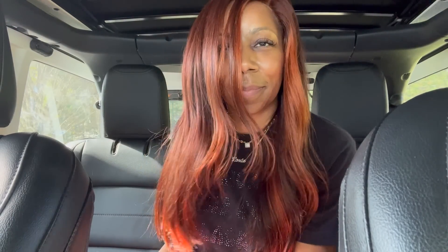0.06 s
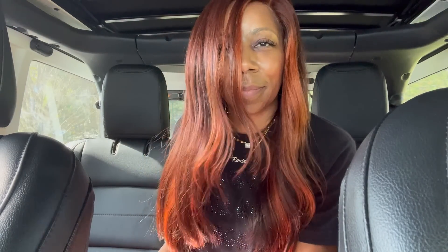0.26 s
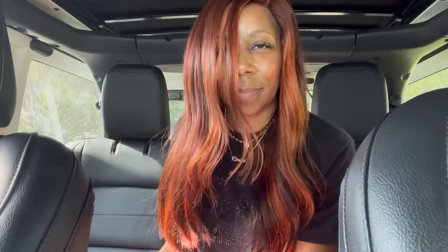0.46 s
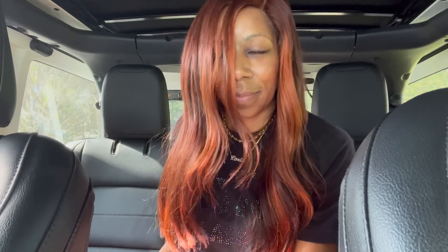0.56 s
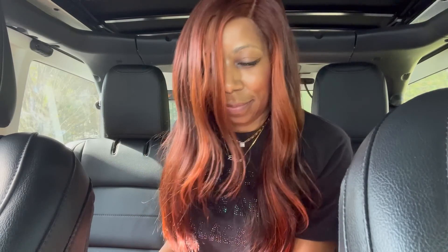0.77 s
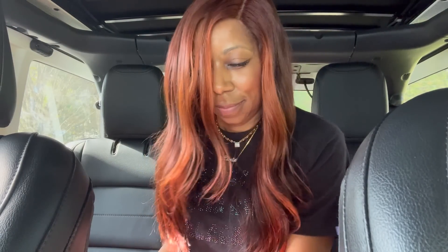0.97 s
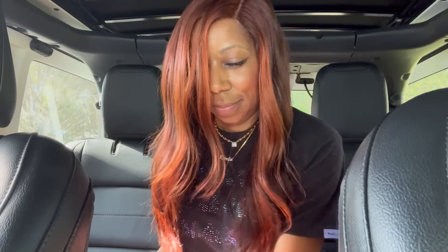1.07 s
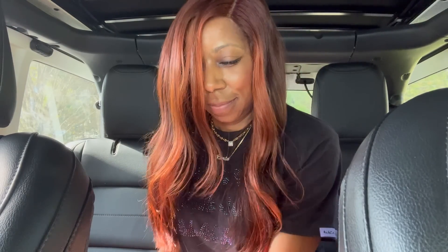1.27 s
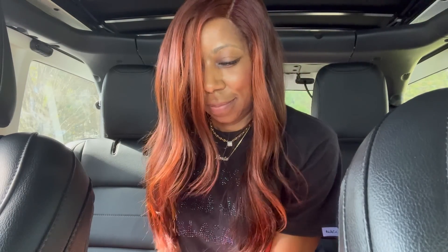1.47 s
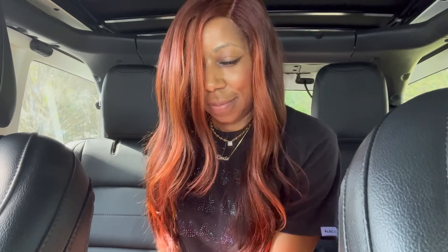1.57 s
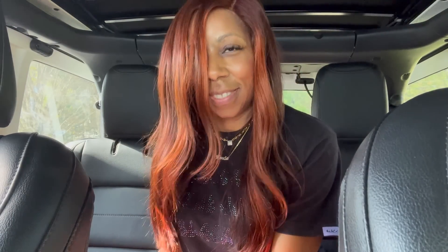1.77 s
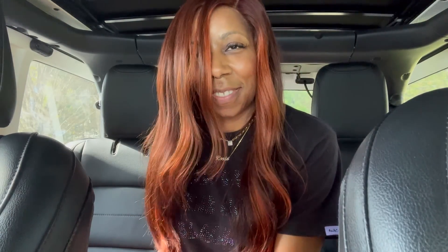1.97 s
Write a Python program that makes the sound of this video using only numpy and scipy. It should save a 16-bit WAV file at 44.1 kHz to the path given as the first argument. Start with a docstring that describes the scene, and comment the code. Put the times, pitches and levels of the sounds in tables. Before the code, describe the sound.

An electric car window is already moving, hissing along its seals with a faint motor whir, rubbing harder before a deep, boomy thump at 0.46 seconds. Low idling hum and cabin rumble continue. Small plastic ticks, a soft switch click at 0.82 and faint rustling follow. At 1.62 the switch clicks, the drive clunks twice, the door shudders briefly, and a clearer rising motor whine runs to the end.

```python
"""Inside an idling car. Engine hum (wavering sines) sits over cabin rumble (coloured noise). A window
hisses along its seals (noise), its motor whining (gliding sines), and lands with a low thump (swelling door modes).
Trim ticks and switch clicks are grainy noise bursts with ringing modes; a faint rustle comes and goes.
The drive clunks into gear (noise and panel modes), the door shudders (a run of pulses) and the motor runs again."""
import sys
import numpy as np
from scipy import signal
from scipy.fft import rfft, irfft
from scipy.io import wavfile

SR = 44100
rng = np.random.default_rng(int(sys.argv[2]) if len(sys.argv) > 2 else 0)


def unload_audio(sound):
    """Save the sound as a 16-bit wav file, at the path given as the first command line argument."""
    columns = np.transpose(np.atleast_2d(sound))
    # keep every value between -1 and 1, then stretch to whole-number steps
    steps = np.round(np.clip(columns, -1, 1) * 32767)
    wavfile.write(sys.argv[1], SR, steps.astype(np.int16))


N = 88200
T = np.arange(N) / SR  # time [s]

# phase by which the left microphone leads the right: (frequency [Hz], phase [rad])
LEFT_LEAD = [(100, .1), (320, -.2), (500, .8), (700, 2.6), (1000, 1.3), (1700, 2.7), (3000, 6.1),
             (4500, 9.3), (5700, 12.6), (7200, 15.5), (9000, 16.4), (10600, 18.8), (12600, 18.9),
             (14200, 22)]
# low colour of the squeezed rubber and of the shudder: (frequency [Hz], level per Hz [dB])
LOW_COLOUR = [(20, -9), (38, 4.5), (110, 2.5), (200, -19.5), (400, -28), (1000, -53.5), (8000, -100)]


def from_db(db):
    """Decibels to gain, down to a floor far below hearing."""
    return np.exp(np.maximum(db, -300) * (np.log(10) / 20))


def pan(db):
    """Left and right gains for a level difference; positive is louder on the left."""
    return from_db(np.array([[db], [-db]]) / 2)


def at_hz(points, hz):
    """Read a table on a log-frequency axis."""
    f, value = np.transpose(points)
    return np.interp(np.log(hz + 1), np.log(f), value)


def noise(spectrum):
    """Coloured cabin noise at a pair of microphones, falling away below its first point; overall rms 1."""
    # how alike the two microphones hear, negative read as 0: (frequency [Hz], coherence)
    likeness = [(40, 0.54), (90, 0.75), (200, 0.4), (300, 0.82), (480, -0.17), (680, 0.78), (1000, 0.3),
                (2200, 0.25), (3500, 0.32), (6000, -0.22), (8000, 0.98), (9500, 0.58), (11000, 0.9),
                (14000, 0.98)]
    # left-right balance: (frequency [Hz], level difference [dB])
    tilt = [(180, 1.5), (290, -2.5), (430, -0.2), (800, -0.5), (2300, 0), (3500, -3), (5200, -4.5),
            (7000, -1.5), (8000, 0)]
    hz = np.fft.rfftfreq(N, 1 / SR)
    alike = np.clip(at_hz(likeness, hz), 0, .98)
    mid, side = rfft(rng.standard_normal((2, N)))
    sign = np.array([[1], [-1]])  # left, right
    balance = from_db(sign * at_hz(tilt, hz) / 2)
    ears = balance * np.exp(.5j * sign * at_hz(LEFT_LEAD, hz))
    low_cut = np.minimum(hz / spectrum[0][0], 1) ** 2
    gain = from_db(at_hz(spectrum, hz)) * low_cut
    blend = np.sqrt(1 + alike) * mid + np.sqrt(1 - alike) * side * sign
    x = irfft(gain * ears * blend, N)
    return x / x.std()


def drift(rate):
    """Slow random wavering, fading above the rate [Hz]; spread 1."""
    hz = np.fft.rfftfreq(N, 1 / SR)
    x = irfft(rfft(rng.standard_normal(N)) / (1 + (hz / rate) ** 2) ** 2, N)
    return (x - x.mean()) / x.std()


def gate(start, stop, rise, t60):
    """Straight attack, hold until stop, exponential release."""
    attack = np.clip((T - start) / rise, 0, 1)
    return attack * from_db(-60 * np.maximum(T - stop, 0) / t60)


def hit(start, rise, t60):
    """Attack, then release at once."""
    return gate(start, start + rise, rise, t60)


def swelling_sine(start, hz, swell):
    """A struck mode: its envelope swells to 1 over the swell time [s], then dies away."""
    age = np.maximum(T - start, 0)
    return age / swell * np.exp(1 - age / swell) * np.sin(2 * np.pi * hz * age)


def ringing(modes, start, size=8192):
    """One brief strike on a set of modes, each with a random strength and phase in either ear."""
    STRENGTH_SCATTER_DB = 1.5
    age, first = T[:size], int(start * SR)
    ring = 0
    for hz, db, t60 in modes:
        strength = from_db(db + STRENGTH_SCATTER_DB * rng.standard_normal((2, 1)))
        wave = np.sin(2 * np.pi * (hz * age + rng.random((2, 1))))
        ring = ring + strength * from_db(-60 * age / t60) * wave
    out = np.zeros((2, N))
    out[:, first:first + size] = ring * np.minimum(age / 0.0016, 1)
    return out


def idle():
    """Engine orders, multiples of a wandering firing rate, over a rumble that swells softly now and then."""
    FIRING_HZ, WANDER_SHARE, FLUTTER_DB, RUMBLE_DB = 70.48, 0.0083, 2.0, -36
    # engine orders: (multiple of the firing rate, level [dB], left-right difference [dB])
    orders = [(1, -50.5, -13.5), (2, -44, -2), (3, -53.5, -1), (4, -46.5, -6)]
    # colour of the cabin rumble: (frequency [Hz], level per Hz [dB])
    rumble_colour = [(18, -6), (30, -3), (48, 2.5), (90, 1), (125, -5.5), (170, -13.5), (300, -14.5),
                     (430, -17.5), (560, -19.5), (690, -20.5), (900, -23), (1200, -33), (2000, -35.5),
                     (3500, -45.5), (6000, -51), (8000, -60.5), (12000, -59), (15000, -69)]
    # soft swells: (centre time [s], level [dB], half width [s])
    soft_swells = [(.125, -39, .03), (.225, -35.5, 0.02), (.365, -40.5, 0.026), (0.829, -40, 0.028),
                   (1.2, -40, 0.047), (1.55, -40, 0.027)]
    # colour of the swells: (frequency [Hz], level per Hz [dB])
    swell_colour = [(60, -10), (130, 3), (220, -7), (420, -10), (650, -19), (1200, -34), (8000, -90)]
    phase = 2 * np.pi * np.cumsum(FIRING_HZ * (1 + WANDER_SHARE * drift(3))) / SR
    hum = 0
    for multiple, db, left_right in orders:
        level = from_db(db + FLUTTER_DB * drift(7.3))
        hum = hum + pan(left_right) * level * np.sin(multiple * phase + 2 * np.pi * rng.random())
    swells = sum(from_db(db) * np.exp(-.5 * ((T - s) / width) ** 2) for s, db, width in soft_swells)
    rumble = from_db(RUMBLE_DB) * noise(rumble_colour)
    return np.sqrt(2) * hum + rumble + swells * noise(swell_colour)


def window_runs():
    """The glass hisses along its seals while the motor's whining partials glide up to full speed."""
    HISS_RISE_S, RELEASE_T60_S = 0.011, 0.069
    WHINE_DELAY_S, WHINE_RISE_S = 0.025, 0.035  # the whine fades in after the hiss starts
    GLIDE_PER_S2, SPIN_UP_S = 0.1255, .34  # pitch gained, as a share per second squared, and for how long
    WAVER_SHARE, FLUTTER_DB = .002, 1.5
    # window runs: (start [s], stop [s], hiss level [dB], whine at start [Hz], whine level [dB])
    runs = [(-.4, 0.48, -49.5, 782, -66.5), (1.679, 2.2, -48, 786, -50.5)]
    # colour of the seals: (frequency [Hz], level per Hz [dB])
    seal_colour = [(250, 18), (500, 13.5), (900, 5), (1250, 0.5), (2200, -0.5), (3500, 2), (6000, -1),
                   (8000, -3), (10000, -4.5), (12500, -5), (14500, -5)]
    # motor partials: (multiple of the whine, relative level [dB])
    motor_partials = [(.5, -18), (.68, -13), (1, 0.5), (2, -18), (3, -20)]
    # the seal rubs harder just before the stop: (time [s], level [dB])
    rub_level = [(.37, -65), (.42, -50.5), (.465, -50), (.51, -82)]
    # colour of the rub: (frequency [Hz], level per Hz [dB])
    rub_colour = [(1500, 8), (3000, 5), (6000, 1), (8500, -4), (12000, 1.5), (14500, -10.5)]
    out = 0
    hiss = noise(seal_colour) * from_db(.6 * drift(12))
    for start, stop, hiss_db, hz, whine_db in runs:
        age = np.maximum(T - start, 0)
        speed = 1 + GLIDE_PER_S2 * np.minimum(age, SPIN_UP_S) ** 2 + WAVER_SHARE * drift(13)
        phase = 2 * np.pi * np.cumsum(hz * speed) / SR
        whine = 0
        for multiple, db in motor_partials:
            level = from_db(whine_db + db + FLUTTER_DB * drift(44))
            whine = whine + level * np.sin(multiple * phase + np.array([[.6], [0]]))
        whine_gate = gate(start + WHINE_DELAY_S, stop, WHINE_RISE_S, RELEASE_T60_S)
        out = out + np.sqrt(2) * whine * pan(db=2) * whine_gate
        out = out + from_db(hiss_db) * hiss * gate(start, stop, HISS_RISE_S, RELEASE_T60_S)
    rub_db = np.interp(T, *np.transpose(rub_level), left=-120, right=-120)
    return out + from_db(rub_db) * noise(rub_colour)


def ticks():
    """Plastic ticks of the trim: grainy noise bursts, dull and bright, over the modes they ring."""
    GRAIN_DB, DULL_RING_DB, SNAP_NOISE_DB = 2.5, -1.5, 0.5  # flutter, then offsets to the tick levels
    # trim ticks: (time [s], dull level [dB], bright snap level [dB], noise t60 [s])
    trim_ticks = [(0.049, -44, -63, 0.13), (0.661, -46.5, -82, 0.1), (0.927, -46.5, -84, 0.12),
                  (1.074, -53, -58, 0.087), (1.162, -47.5, -72, 0.079), (1.3684, -43.5, -46, 0.13),
                  (1.397, -55, -69, 0.078), (1.584, -53, -59.5, 0.053)]
    # colour of the dull tick: (frequency [Hz], level per Hz [dB])
    dull_colour = [(300, -16), (900, 12), (1500, 0.5), (2100, 0.5), (2500, -8), (3400, 2.5), (4700, -5.5),
                   (6000, -21), (8000, -44)]
    # colour of the bright snap: (frequency [Hz], level per Hz [dB])
    snap_colour = [(1500, 16), (3200, -7), (4500, 5), (5800, 6), (7500, -1.5), (11000, -6.5), (13000, -4),
                   (15500, -23)]
    # modes of the dull tick: (frequency [Hz], relative level [dB], t60 [s])
    dull_modes = [(948, -3.5, 0.075), (1257, -16, 0.14), (1980, -3.5, 0.081), (3460, -5.5, 0.078),
                  (3830, -9, 0.093)]
    # modes of the bright snap: (frequency [Hz], relative level [dB], t60 [s])
    snap_modes = [(1214, -0.5, 0.061), (2900, -2.5, 0.088), (3170, -4, .08), (3510, -16, 0.067),
                  (4534, -2, 0.076), (5820, -3.5, 0.098), (10200, -11.5, 0.07)]
    grain = from_db(GRAIN_DB * drift(400))
    dull = noise(dull_colour) * grain
    snap = noise(snap_colour) * grain * from_db(SNAP_NOISE_DB)
    out = 0
    for s, db, snap_db, t60 in trim_ticks:
        dull_ring = from_db(db + DULL_RING_DB) * ringing(dull_modes, s)
        snap_ring = from_db(snap_db) * ringing(snap_modes, s)
        burst = (from_db(db) * dull + from_db(snap_db) * snap) * hit(s, 0.0027, t60)
        out = out + pan(db=-4.0) * (dull_ring + snap_ring) + burst
    return pan(db=-0.5) * out


def end_stop():
    """The glass lands: door modes swell and die under a thud and a rough knock, the rubber gives, the glass settles."""
    STOP_S = .4595
    THUD_DB, THUD_T60_S = -23, 0.15
    KNOCK_DB, KNOCK_T60_S, KNOCK_GRAIN_DB = -40.5, 0.1, 1
    # door modes struck by the glass: (frequency [Hz], level [dB], swell [s], left-right difference [dB])
    door_modes = [(49.34, -23, 0.043, -4.5), (72.84, -22, 0.036, 7.5), (123.8, -15, 0.015, 1.5),
                  (188.2, -25.5, 0.0098, -20.5), (250, -19.5, 0.0084, -0.5), (347, -31, 0.0068, -14),
                  (439, -37.5, 0.012, 7), (501, -37.5, 0.0074, -14), (584, -41, 0.01, -2)]
    # colour of the blow itself: (frequency [Hz], level per Hz [dB])
    thud_colour = [(30, -2), (100, 2.5), (300, -2.5), (550, -9.5), (750, -19.5), (1500, -30), (3000, -43.5),
                   (8000, -69)]
    # colour of the glass knocking in its frame: (frequency [Hz], level per Hz [dB])
    knock_colour = [(600, -3), (780, -12), (920, 12.5), (1050, -2), (1800, -5), (2400, -8), (4000, -20),
                    (8000, -41), (14000, -60)]
    # the rubber gives just after the blow: (time [s], level [dB], t60 [s])
    rubber_squeeze = (0.48, -23.5, 0.26)
    # soft bump of the settling glass: (time [s], level [dB], frequency [Hz], swell [s])
    settling_bump = (.549, -27, 105, .007)
    thud = from_db(THUD_DB) * noise(thud_colour) * hit(STOP_S + 0.0022, 0.0037, THUD_T60_S)
    ring = 0
    for hz, db, swell, left_right in door_modes:
        ring = ring + pan(left_right) * from_db(db) * swelling_sine(STOP_S, hz, swell)
    knock_level = from_db(KNOCK_DB + KNOCK_GRAIN_DB * drift(250))
    knock = knock_level * noise(knock_colour) * hit(STOP_S, 0.0023, KNOCK_T60_S)
    s, db, t60 = rubber_squeeze
    squeeze = from_db(db) * noise(LOW_COLOUR) * hit(s, 0.011, t60)
    s, db, hz, swell = settling_bump
    settle = from_db(db) * swelling_sine(s, hz, swell)
    return squeeze + thud + knock + settle - ring  # the door first moves the opposite way


def switch():
    """The rocker clicks: a sharp noise crack, the ringing modes of its plastic cap and a short noise tail."""
    CLICK_T60_S = 0.042
    # clicks: (time [s], crack level [dB], ring level [dB], tail level [dB], tail t60 [s])
    rocker_clicks = [(.8208, -49.5, -53, -52, .15), (1.6193, -41.5, -48, -44.5, 0.15)]
    # colour of crack and tail: (frequency [Hz], level per Hz [dB])
    click_colour = [(600, 12.5), (1400, 9.5), (2000, 8), (2900, 4.5), (4000, -4), (5000, 1.5), (6200, -4),
                    (8000, 2), (10500, 0), (13000, -1), (15500, -15)]
    # modes of the cap: (frequency [Hz], relative level [dB], t60 [s])
    cap_modes = [(1560, 3, 0.064), (2760, -15, 0.084), (4940, -2, .08), (5100, -11, 0.066),
                 (6783, -7.5, .065), (10480, -15, 0.079)]
    out = 0
    grainy = noise(click_colour) * from_db(2.2 * drift(400))
    for s, click_db, ring_db, tail_db, tail_t60 in rocker_clicks:
        crack = from_db(click_db) * hit(s, 0.0021, CLICK_T60_S)
        tail = from_db(tail_db) * hit(s, 0.0033, tail_t60)
        out = out + (crack + tail) * grainy + from_db(ring_db) * ringing(cap_modes, s)
    return pan(db=-1.0) * out


def rustle():
    """A faint high rustle, noise on a drawn level curve, comes and goes between the window runs."""
    # level curve: (time [s], level [dB])
    rustle_level = [(.88, -83), (.99, -68), (1.1, -65), (1.19, -77), (1.28, -77), (1.35, -65)]
    # colour: (frequency [Hz], level per Hz [dB])
    rustle_colour = [(3000, 1.5), (6000, 0), (8000, -10), (11500, -3), (14500, -2.5)]
    db = np.interp(T, *np.transpose(rustle_level), left=-120, right=-120)
    return from_db(db) * noise(rustle_colour)


def clunks():
    """The drive takes up its slack in two knocks, each a short noise crack with dying door panel modes."""
    CRACK_RISE_S, CRACK_LENGTH_S = 0.0028, 0.0066  # the length, before the release, includes the rise
    # knocks of the drive: (time [s], crack level [dB], ring level [dB], crack t60 [s])
    drive_knocks = [(1.632, -25.5, -24.5, 0.09), (1.674, -30, -35, .056)]
    # colour of the crack: (frequency [Hz], level per Hz [dB])
    crack_colour = [(150, -4), (400, 2), (650, 0.5), (800, -3), (950, -4), (1300, 0), (1600, -9.5),
                    (1950, -11.5), (2300, -23.5), (3200, -21.5), (5000, -47), (12000, -52)]
    # door panel modes: (frequency [Hz], relative level [dB], t60 [s], left-right difference [dB])
    panel_modes = [(72.3, -6, 0.25, 1), (279.6, 4, 0.11, -4.5), (348.4, -10, 0.12, -2),
                   (527.6, -4, 0.15, 7.5), (750, -6, 0.11, 11), (1051, -7, 0.048, 0),
                   (1235, -4.5, 0.045, 4), (1580, -16, 0.11, -6), (1816, -19, 0.087, 4),
                   (1974, -12.5, 0.068, 1)]
    out, crack = 0, noise(crack_colour)
    for s, crack_db, ring_db, t60 in drive_knocks:
        ring = 0
        for hz, db, decay, left_right in panel_modes:
            lead = at_hz(LEFT_LEAD, hz) * np.array([[.25], [-.25]])
            wave = np.sin(2 * np.pi * hz * (T - s) + lead)
            ring = ring + pan(left_right) * from_db(db) * hit(s, 0.0027, decay) * wave
        burst = crack * gate(s, s + CRACK_LENGTH_S, CRACK_RISE_S, t60)
        out = out + from_db(ring_db) * ring + from_db(crack_db) * burst
    return out


def shudder(count=5):
    """The glass sticks and slips as it starts: a swelling, fading run of pressure pulses over low noise."""
    FIRST_JOLT_S, JOLT_GAP_S, JOLT_WIDTH_S = 1.7075, 0.026, 0.00529
    PEAK_S, SPREAD_S, JOLT_DB, NOISE_DB = 1.738, 0.049, -18.5, -25.5
    swell = np.exp(-.5 * ((T - PEAK_S) / SPREAD_S) ** 2)
    u = (T - FIRST_JOLT_S - JOLT_GAP_S * np.arange(count)[:, None]) / JOLT_WIDTH_S
    # each jolt is a positive peak between two dips
    jolts = ((1 - u ** 2) * np.exp(-.5 * u ** 2)).sum(axis=0)
    return swell * (from_db(JOLT_DB) * jolts + from_db(NOISE_DB) * noise(LOW_COLOUR))


def scene():
    """Everything heard inside the car, summed."""
    return idle() + window_runs() + ticks() + end_stop() + switch() + rustle() + clunks() + shudder()


def record(dry):
    """A steep elliptic low-pass cuts the top."""
    CUTOFF_HZ = 14750
    return signal.sosfilt(signal.ellip(10, .2, 80, CUTOFF_HZ, fs=SR, output="sos"), dry)


dry = scene()
out = record(dry)
unload_audio(out)
```